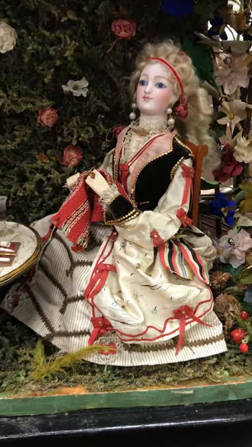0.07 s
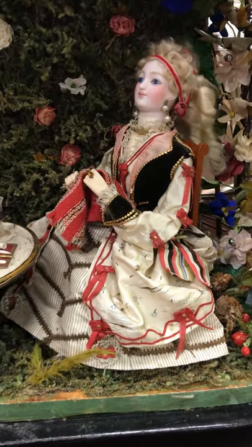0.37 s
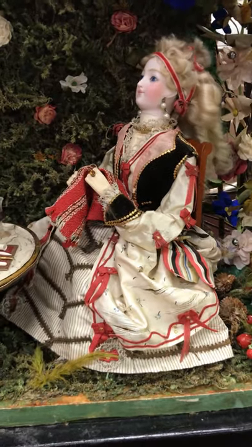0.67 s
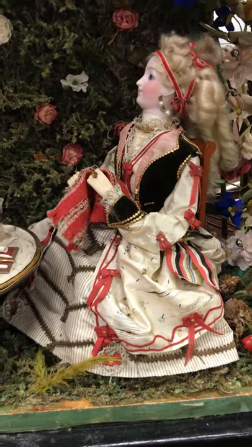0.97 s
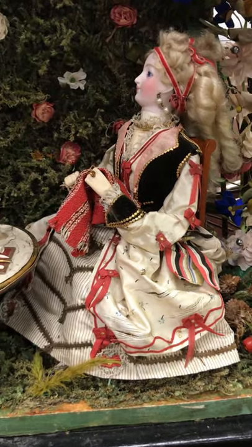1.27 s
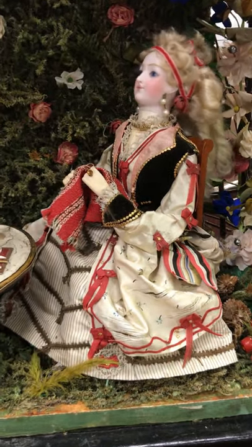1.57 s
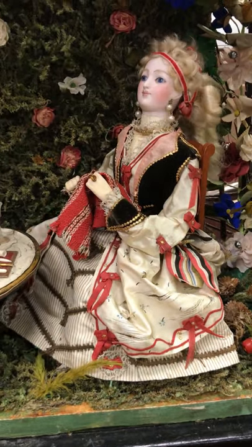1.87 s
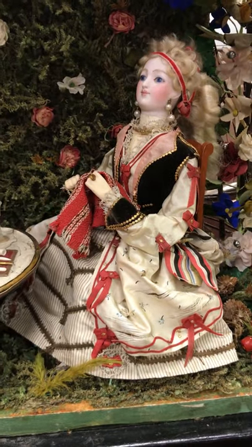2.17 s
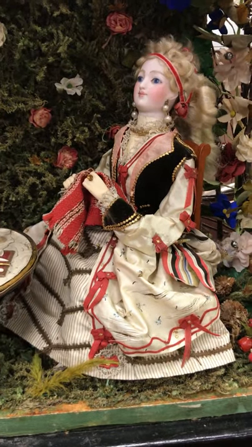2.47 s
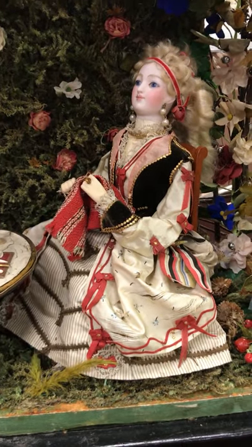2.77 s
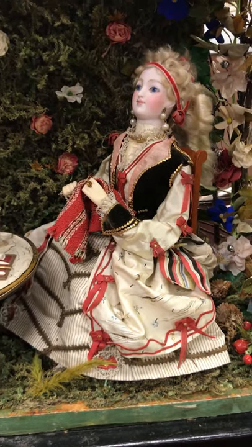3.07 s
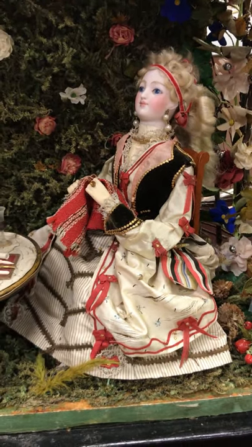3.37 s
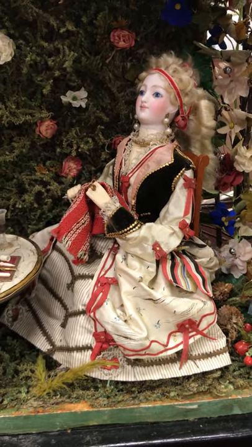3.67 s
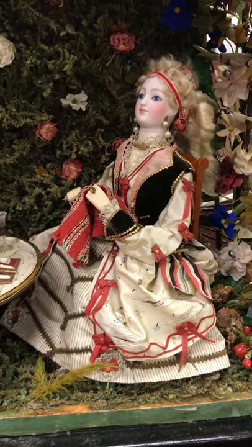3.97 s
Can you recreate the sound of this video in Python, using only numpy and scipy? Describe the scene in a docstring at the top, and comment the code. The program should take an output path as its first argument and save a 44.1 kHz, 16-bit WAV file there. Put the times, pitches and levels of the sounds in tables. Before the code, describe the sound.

A wind-up doll's mechanism clacks and ticks in a quiet room. After a faint shuffle and cloth rustle, a soft hollow knock comes at about 1.2 seconds. Dry clacks with small trailing ticks follow near 1.8 and 2.7 seconds, then the loudest cluster around 3.5 seconds. A low hum and soft hiss run throughout, with very faint, thin squeaks recurring roughly once a second.

```python
"""Wind-up doll turning its head

In a quiet room, cams drop the doll's levers with dry clacks that ring its hollow body. Loose links
tick after them, and hair and cloth rustle faintly as it moves. Two low hums beat against each other
under a soft hiss; a very thin bearing squeak returns with each turn of the works."""
import sys
import numpy as np
from scipy import signal
from scipy.fft import rfft, irfft
from scipy.io import wavfile
from scipy.ndimage import uniform_filter1d

SR = 44100
rng = np.random.default_rng(int(sys.argv[2]) if len(sys.argv) > 2 else 0)


def persist_wave(psi):
    """Save psi, clipped to +-1, as 16-bit WAV."""
    counts = np.round(np.clip(psi, -1, 1) * 32767).astype(np.int16)
    wavfile.write(sys.argv[1], SR, np.atleast_2d(counts).T)


N = 176400
TIME = np.arange(N) / SR
HIT = TIME[:SR // 5]  # time axis of one hit

# modes of the hollow body: f/Hz, level/dB, t60/s
BODY_MODES = [(162.2, -4, 0.14), (238.3, -0.5, 0.11), (280.4, 2.5, 0.043), (336, 1, 0.039),
              (539, 0.5, 0.041), (631, -2, 0.059), (911, 4, 0.03), (1030, -2.5, 0.022), (1512, 3, 0.026),
              (1626, -8, 0.046), (2198, -1.5, 0.028), (2684, -10.5, 0.028), (3268, 2.5, 0.021),
              (4170, -5.5, 0.0092)]


def amp(db):
    """Decibels to gain."""
    return 10 ** (np.asarray(db) / 20)


def unit(x):
    """Scales to rms 1."""
    return x / np.sqrt(np.mean(x ** 2) + 1e-20)


def read(points, hz):
    """Reads a curve on a log-frequency axis."""
    f, value = np.transpose(points)
    return np.interp(np.log(hz + 1), np.log(f + 1), value)


def add(mix, s, sound):
    """Mixes a sound in at time s."""
    part = mix[max(round(s * SR), 0):][:len(sound)]
    part += sound[:len(part)]


def colour(x, eq):
    """Shapes x with an EQ curve, at rms 1."""
    return unit(irfft(rfft(x) * amp(read(eq, np.fft.rfftfreq(len(x), 1 / SR))), len(x)))


def ring(hz, db, t60, attack_s):
    """One struck mode swells and dies, detuned a little as each blow lands in a different place."""
    swell = 1 - np.exp(-(HIT / attack_s) ** 2)
    pitch = hz * (1 + 0.035 * (2 * rng.random() - 1))
    return swell * amp(db - 60 * HIT / t60) * np.sin(2 * np.pi * (pitch * HIT + rng.random()))


def burst(eq, db, t60, attack_s):
    """A short dying puff of coloured noise."""
    envelope = np.minimum(HIT / attack_s, 1) * amp(db - 60 * HIT / t60)
    return envelope * colour(rng.standard_normal(len(HIT)), eq)


def friction(eq, levels):
    """Dense tiny slips of uneven size make a grainy texture that rides a level curve."""
    slips_per_s, spread_db, slip_t60 = 700, 3, 0.021
    sizes = amp(spread_db * np.minimum(rng.exponential(1, N), 4))
    slips = sizes * (rng.random(N) < slips_per_s / SR)
    envelope = signal.fftconvolve(slips, amp(-60 * HIT / slip_t60))[:N]
    grains = colour(envelope * rng.standard_normal(N), eq)
    return grains * amp(np.interp(TIME, *np.transpose(levels)))


def room_tone():
    """A steady bed of soft hiss and low room rumble."""
    # hiss spectrum: f/Hz, level/dB
    hiss_eq = [(40, -7), (110, -4), (180, -12), (260, -26), (450, -20.5), (900, -27), (1900, -31.5),
               (3300, -29.5), (4900, -34.5), (7600, -36.5), (8800, -35.5), (10500, -40), (11700, -36),
               (15000, -34.5), (17000, -36.5)]
    # rumble spectrum: f/Hz, level/dB
    rumble_eq = [(15, -7.5), (30, -29.5), (46, 5.5), (62, -12), (80, 4.5), (100, -10), (150, -19),
                 (400, -59.5)]
    hiss = amp(-64.5) * colour(rng.standard_normal(N), hiss_eq)
    rumble = amp(-55) * colour(rng.standard_normal(N), rumble_eq)
    return hiss + rumble


def reverb(x):
    """The room answers with a short tail of sparse reflections; the bass lingers longest."""
    # room decay: f/Hz, t60/s
    decay = [(100, 0.53), (300, 0.096), (1000, 0.11), (3000, 0.051), (12000, 0.064)]
    wet_db, predelay_s, density = -12.5, 0.004, 0.1
    n = SR // 2
    taps = rng.choice([-1., 1.], n) * (rng.random(n) < density) * (TIME[:n] > predelay_s)
    hz, t, bands = signal.stft(taps, SR, nperseg=128)
    tail = signal.istft(bands * amp(-60 * t / read(decay, hz)[:, None]), SR, nperseg=128)[1]
    return amp(wet_db) * signal.fftconvolve(x, tail / np.linalg.norm(tail))[:N]


def hums():
    """Two low drifting tones, each with a weak octave, beat against each other."""
    # upper hum: t/s, f/Hz, level/dB
    upper = [(0, 64.7, -48.5), (.3, 67.48, -53), (.58, 68.85, -45), (.75, 71.07, -47), (1.2, 67.92, -45.5),
             (1.55, 66.57, -52), (2.25, 66.75, -54), (2.85, 69.13, -46), (3.5, 69.22, -45.5),
             (4, 68.6, -45.5)]
    # lower hum: t/s, f/Hz, level/dB
    lower = [(0, 57.2, -51), (.35, 54.23, -54.5), (.65, 55.5, -55), (.85, 57, -47.5), (1.25, 58.54, -71),
             (1.45, 58.7, -55), (1.75, 59.76, -54.5), (2.05, 59.37, -63), (2.4, 59.25, -45.5),
             (2.8, 59.63, -67.5), (3.5, 59.08, -51), (4, 59.32, -58)]
    out = np.zeros(N)
    for curve in (upper, lower):
        s, hz, db = np.transpose(curve)
        phase = 2 * np.pi * (np.cumsum(np.interp(TIME, s, hz)) / SR + rng.random())
        tone = np.sin(phase) + amp(-28) * np.sin(2 * phase)
        out += np.sqrt(2) * amp(np.interp(TIME, s, db)) * tone
    return out


def whirr():
    """The running gears keep the body's resonances faintly sounding."""
    level_db, tilt_db_per_octave, width_hz = -70, -3.5, 43
    hz = np.fft.rfftfreq(N, 1 / SR)
    body = sum(amp(db + tilt_db_per_octave * np.log2(mode_hz)) / (1 + 2j * (hz - mode_hz) / width_hz)
               for mode_hz, db, _ in BODY_MODES)
    return amp(level_db) * unit(irfft(rfft(rng.standard_normal(N)) * body, N))


def shuffle():
    """Friction in the moving works makes a low, grainy shuffle."""
    # spectrum of the works: f/Hz, level/dB
    works_eq = [(60, -21), (150, -0.5), (290, 3.5), (400, -8.5), (530, -8), (750, -13.5), (1500, -22.5),
                (2600, -30.5), (3300, -29), (5000, -42), (17000, -42)]
    # shuffle envelope: t/s, level/dB
    levels = [(0, -60), (.16, -69), (.95, -69.5), (1.1, -65.5), (1.35, -67), (1.6, -63.5), (1.9, -60.5),
              (2.15, -67), (2.6, -65), (2.759, -63.5), (2.861, -66.5), (3.35, -66.5), (3.6, -63),
              (3.88, -65.5), (4, -73)]
    return friction(works_eq, levels)


def cloth():
    """Hair and dress rustle as the head turns, with a few crackles topped by a narrow, bright zip."""
    # fabric spectrum: f/Hz, level/dB
    cloth_eq = [(1000, 2), (4000, -13.5), (6000, -3.5), (7500, -12), (8700, -1.5), (10500, -11),
                (14000, -4), (17000, -3)]
    # rustle envelope: t/s, level/dB
    levels = [(0, -86), (.38, -70.5), (.55, -74), (0.899, -69.5), (1.1, -71.5), (1.248, -83), (1.68, -70.5),
              (1.799, -81), (2.1, -71.5), (2.3, -76), (2.95, -75.5), (4, -81)]
    # single crackles: t/s, broadband level/dB, zip level/dB
    crackles = [(0.396, -70, -61.5), (0.782, -57.5, -83), (0.8939, -60, -50.5), (.9144, -64, -62),
                (1.045, -63, -76), (1.069, -60, -68)]
    # zip spectrum: f/Hz, level/dB
    zip_eq = [(6500, -44), (8200, -10), (8750, 8), (9300, -15), (11000, -45)]
    out = friction(cloth_eq, levels)
    for s, db, zip_db in crackles:
        add(out, s, burst(cloth_eq, db, t60=0.068, attack_s=0.002))
        add(out, s, burst(zip_eq, zip_db, t60=0.02, attack_s=0.00099))
    return out


def squeaks():
    """A dry bearing sticks and slips: rough, broken glides of a very high tone."""
    # squeaks, a group for each turn of the works: t/s, length/s, level/dB, start f/Hz, end f/Hz
    glides = [(.088, 0.019, -63, 15550, 15050), (.105, 0.029, -61, 15020, 14980),
              (0.148, .09, -64, 15100, 15880), (.268, 0.054, -74, 15700, 15780),
              (1.145, 0.041, -61, 15230, 14900), (1.278, .04, -65, 15650, 15750),
              (1.958, .045, -68, 14900, 15280), (2.002, 0.088, -71, 15500, 15770),
              (2.781, .042, -61.5, 15120, 15300), (2.842, 0.073, -67, 15300, 15600),
              (3.677, .016, -58, 15400, 15200), (3.691, .125, -69, 15130, 15850)]
    waver_hz, flicker_db = 85, 3
    out = np.zeros(N)
    for s, length, db, start_hz, end_hz in glides:
        progress = np.linspace(0, 1, int(length * SR))
        jitter = unit(uniform_filter1d(rng.standard_normal((2, SR)), size=90))
        waver, flicker = jitter[:, :len(progress)]
        hz = start_hz + (end_hz - start_hz) * progress + waver_hz * waver
        envelope = amp(db + flicker_db * flicker) * np.sqrt(abs(np.sin(np.pi * progress)))
        add(out, s, envelope * np.sin(2 * np.pi * np.cumsum(hz) / SR))
    return out


def rod_rubs():
    """Moving rods rub briefly, each in its own low band."""
    # rod strokes: t/s, length/s, level/dB, centre f/Hz
    strokes = [(0, .125, -57.5, 286), (1.029, 0.085, -60.5, 330), (1.611, .09, -64.5, 500),
               (3.925, 0.077, -63.5, 369.4)]
    # rub spectrum: ratio to centre, level/dB
    band = [(.4, -20), (.8, -2.5), (1, 1.5), (1.3, -10), (2.2, -20), (6, -34.5), (20, -65)]
    out = np.zeros(N)
    for s, length, db, hz in strokes:
        swell = np.sqrt(np.hanning(int(length * SR)))
        noise = colour(rng.standard_normal(SR // 2), [(hz * ratio, level) for ratio, level in band])
        add(out, s, amp(db) * swell * unit(noise[:len(swell)]))
    return out


def link_ticks():
    """Loose links tick with a few quickly damped modes and a light clatter."""
    # link hits: t/s, level/dB, f/Hz
    ticks = [(0.249, -56.5, 1610), (1.541, -55, 1790), (1.7972, -35.5, 2000), (1.8190, -43, 1800),
             (1.834, -47, 1560), (1.858, -55, 1560), (2.0324, -47.5, 1470), (2.043, -56, 1510),
             (2.237, -53, 1650), (2.4552, -56, 1560), (2.704, -40, 1650), (2.7158, -36.5, 2140),
             (2.73, -45, 1480), (3.2369, -57, 1476), (3.5370, -33, 1940), (3.5670, -32, 1520),
             (3.6127, -51, 1994)]
    # modes of a link: ratio to the hit's pitch, level/dB, t60/s
    modes = [(.58, -18, 0.017), (.82, -6.5, 0.012), (1, 1, 0.0073), (1.14, -32, 0.0054), (1.75, -8, 0.0031)]
    # link clatter spectrum: f/Hz, level/dB
    clatter_eq = [(200, -40), (600, 8), (950, 1), (1250, 3), (1550, 10.5), (2200, 1.5), (2700, -3),
                  (3400, -8.5), (5000, -23), (17000, -58)]
    out = np.zeros(N)
    for s, level, hz in ticks:
        for ratio, db, t60 in modes:
            add(out, s, ring(hz * ratio, level + db, t60, attack_s=0.00068))
        add(out, s, burst(clatter_eq, level - 10, t60=0.037, attack_s=0.0016))
    return out


def base_thuds():
    """The hollow base gives under a blow with about two cycles of a low note."""
    # thuds: peak t/s, level/dB, f/Hz
    thuds = [(.075, -50.5, 290), (1.184, -41, 324), (1.7375, -36.5, 290), (2.656, -39, 288),
             (2.712, -38, 367), (2.720, -36, 238), (2.762, -44, 237), (3.4865, -27, 274),
             (3.621, -42.5, 262.6)]
    width_s, centre_s = 0.0037, HIT.mean()
    t = HIT - centre_s
    envelope = np.exp(-(t / width_s) ** 2)
    out = np.zeros(N)
    for s, db, hz in thuds:
        add(out, s - centre_s, amp(db) * envelope * np.cos(2 * np.pi * hz * t))
    return out


def lever_clacks():
    """A dropped lever makes a snap of contact, rings the body and sets its minor modes clattering."""
    # lever drops: t/s, then level/dB of thump, knock, clack, ring and snap
    drops = [(1.1778, -45.5, -45.5, -47.5, -45, -78), (1.416, -55, -56, -64, -64, -74),
             (1.7310, -45, -38.5, -42, -42.5, -56.5), (2.649, -42, -47.5, -46, -49, -76),
             (2.7094, -41, -47, -40, -55, -44), (2.7281, -47.5, -40.5, -36, -51, -49),
             (3.2367, -71, -49.5, -62.5, -82, -83), (3.4796, -42.5, -38, -40, -33.5, -46.5),
             (3.5523, -47, -43.5, -43, -43, -66), (3.5570, -46, -43, -55, -41.5, -64),
             (3.5669, -52, -42, -61, -46, -66), (3.6130, -49.5, -63, -53, -61, -80)]
    # spectrum of the body's dense minor modes: f/Hz, level/dB
    clatter_eq = [(100, -28), (200, 11.5), (420, 0.5), (600, -13), (770, 3), (950, 11.5), (1280, -2.5),
                  (1550, -9), (2200, 3), (2600, -14), (3400, -6.5), (5000, -12), (17000, -34)]
    # contact snap spectrum: f/Hz, level/dB
    snap_eq = [(500, -9), (1500, -10), (3500, 0.5), (5000, 4), (7400, 2), (8700, 2), (10500, -1.5),
               (13300, 2), (17000, -12)]
    thump_hz, knock_hz, clack_hz, ring_hz = 290, 700, 2060, 3000
    out = np.zeros(N)
    for s, thump_db, knock_db, clack_db, ring_db, snap_db in drops:
        blow_eq = [(thump_hz, thump_db), (knock_hz, knock_db), (clack_hz, clack_db), (ring_hz, ring_db)]
        for hz, db, t60 in BODY_MODES:
            attack_s = 0.0011 + 0.95 / hz  # low modes bloom more slowly
            add(out, s, ring(hz, db + read(blow_eq, hz), t60, attack_s))
        clatter_db = (knock_db + clack_db) / 2 - 0.5
        add(out, s, burst(clatter_eq, clatter_db, t60=0.03, attack_s=0.00098))
        add(out, s, burst(snap_eq, snap_db, t60=0.017, attack_s=0.0006))
    return out


def scene():
    """A mono mix: the doll and its reverb, with hums, squeaks and room tone left dry."""
    doll = lever_clacks() + base_thuds() + link_ticks() + rod_rubs() + cloth() + whirr() + shuffle()
    return (doll + reverb(doll) + hums() + squeaks() + room_tone())[None]


def record(dry):
    """A steep low-pass trims the very top of the treble."""
    cutoff_hz = 17180
    lowpass = signal.firwin(511, cutoff_hz, window=("kaiser", 9), fs=SR)
    return signal.oaconvolve(dry, lowpass[None], "same")


dry = scene()
out = record(dry)
persist_wave(out)
```